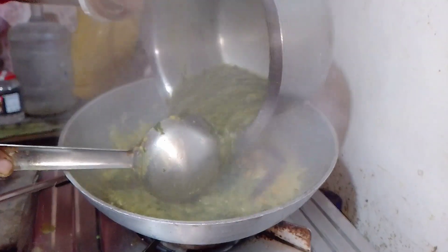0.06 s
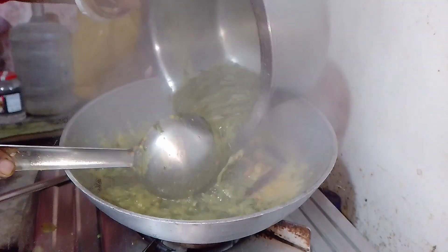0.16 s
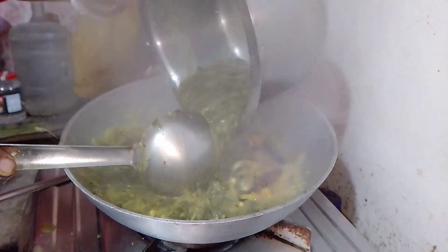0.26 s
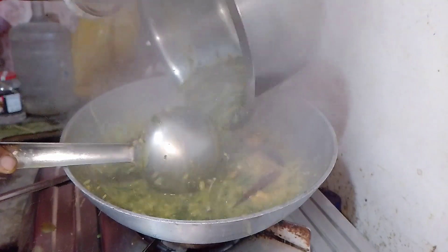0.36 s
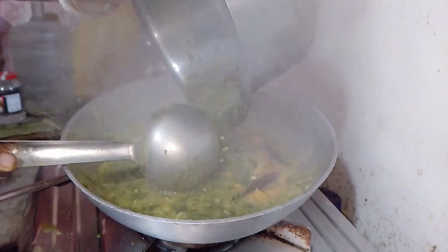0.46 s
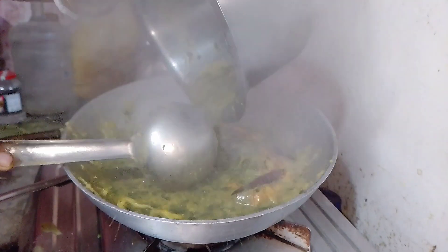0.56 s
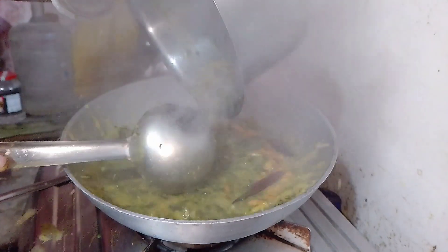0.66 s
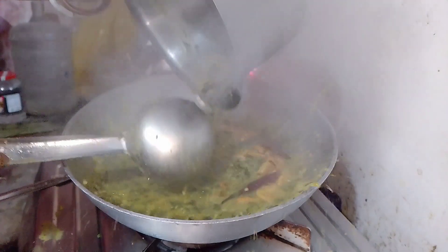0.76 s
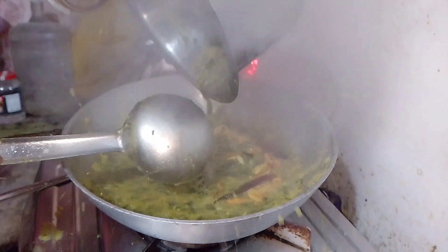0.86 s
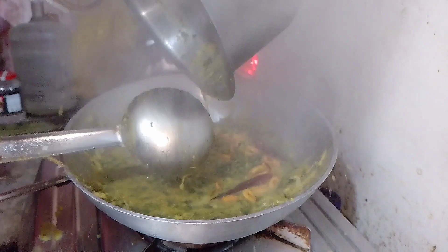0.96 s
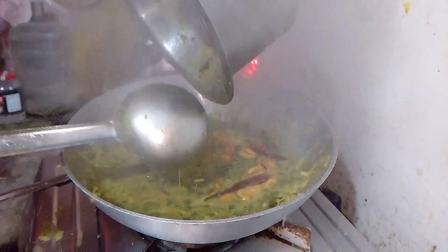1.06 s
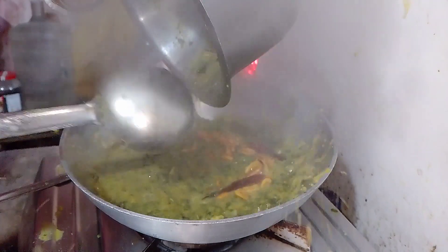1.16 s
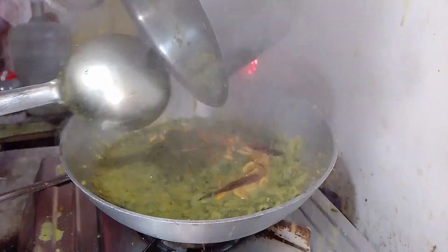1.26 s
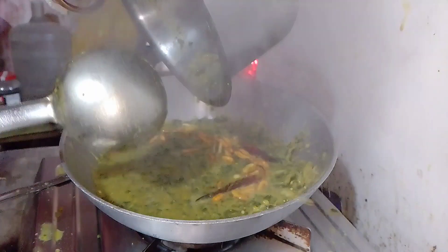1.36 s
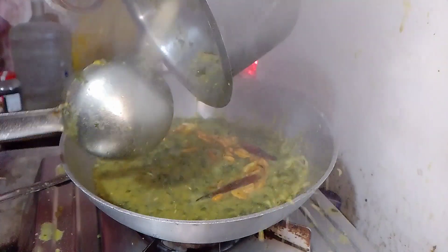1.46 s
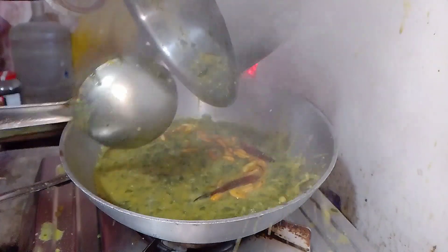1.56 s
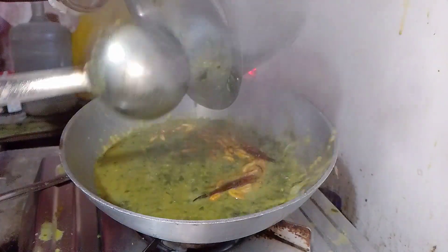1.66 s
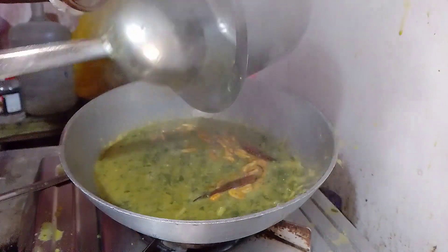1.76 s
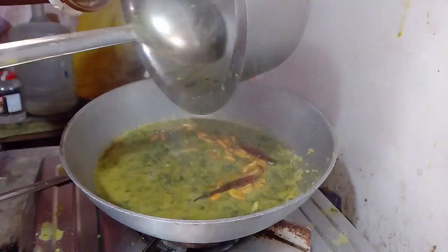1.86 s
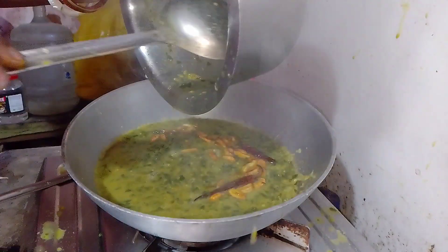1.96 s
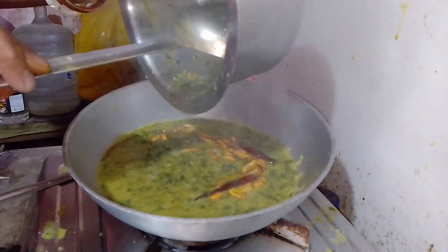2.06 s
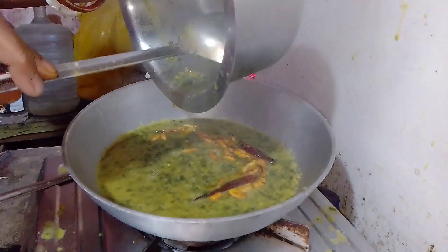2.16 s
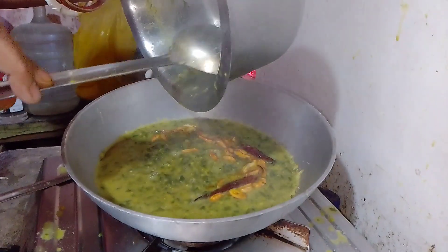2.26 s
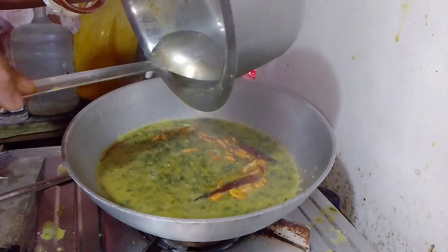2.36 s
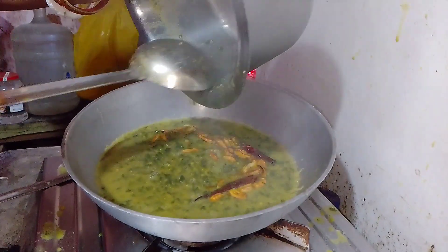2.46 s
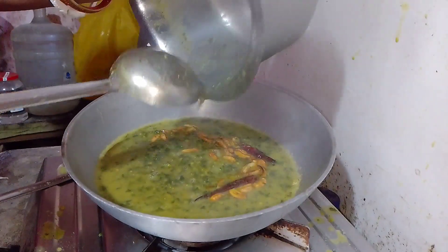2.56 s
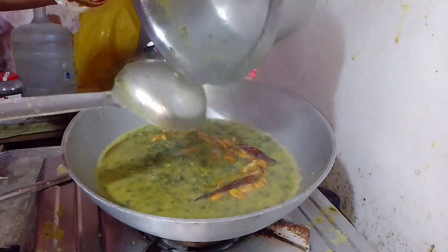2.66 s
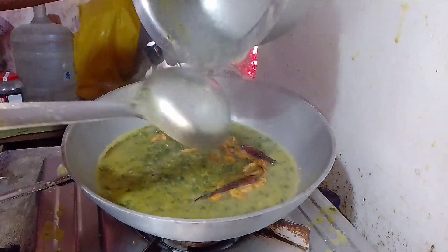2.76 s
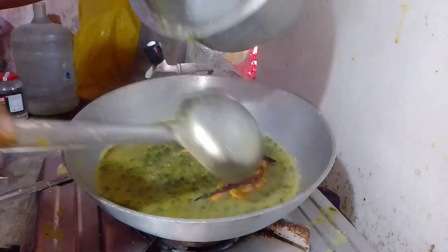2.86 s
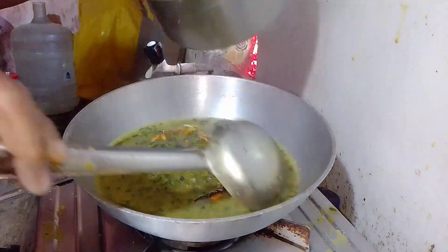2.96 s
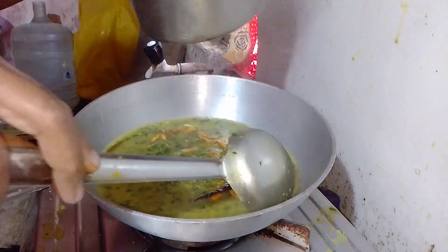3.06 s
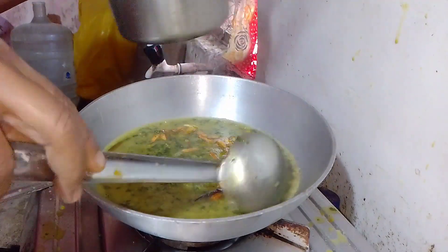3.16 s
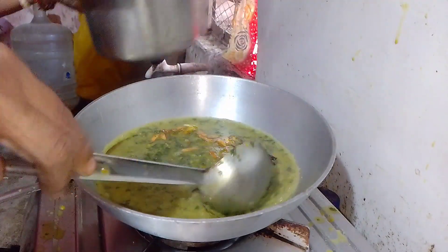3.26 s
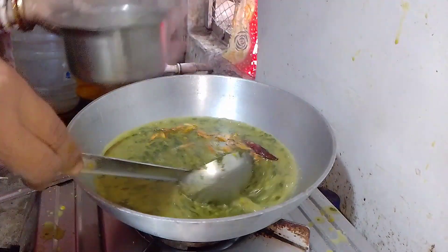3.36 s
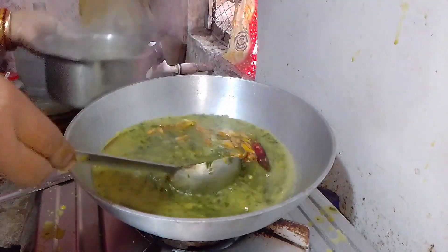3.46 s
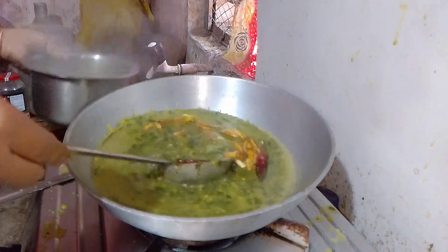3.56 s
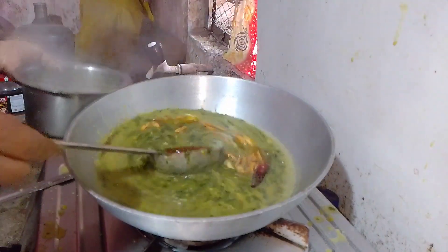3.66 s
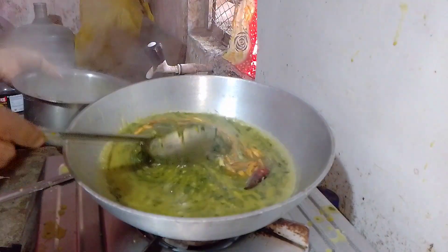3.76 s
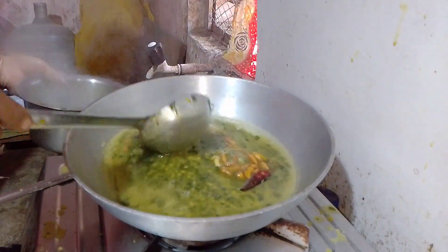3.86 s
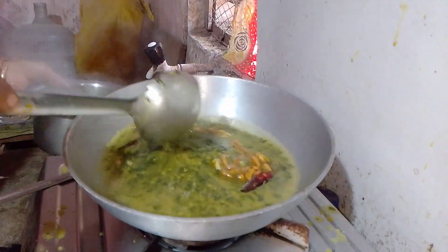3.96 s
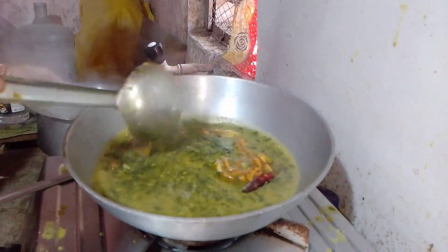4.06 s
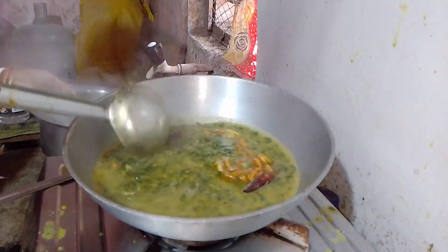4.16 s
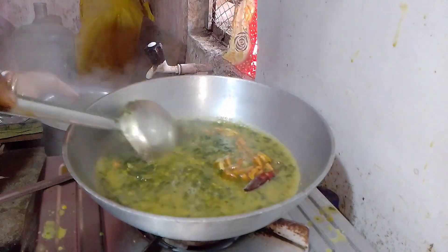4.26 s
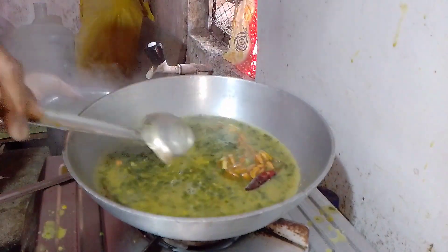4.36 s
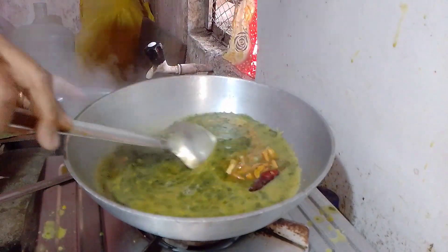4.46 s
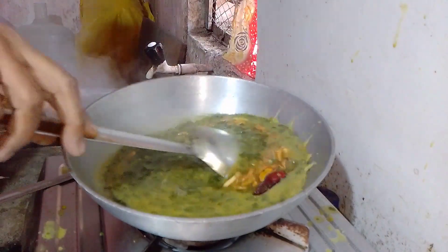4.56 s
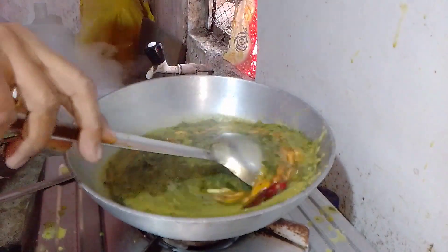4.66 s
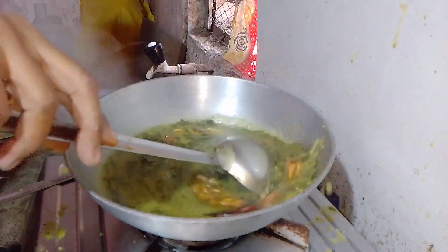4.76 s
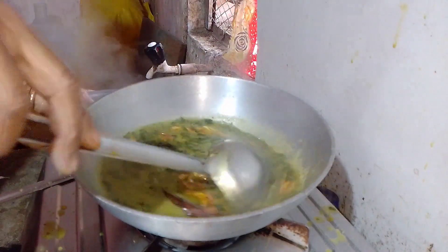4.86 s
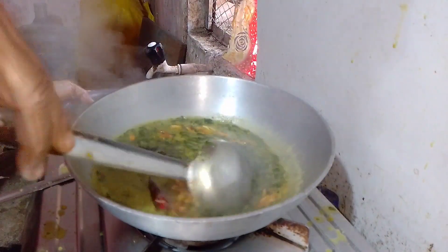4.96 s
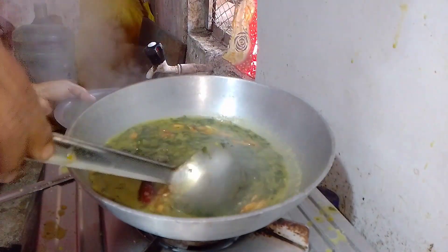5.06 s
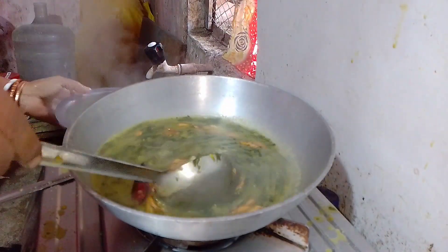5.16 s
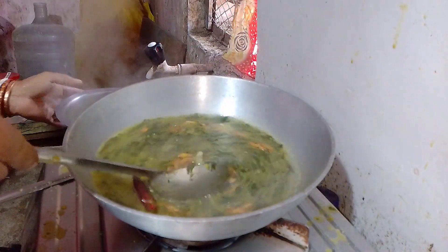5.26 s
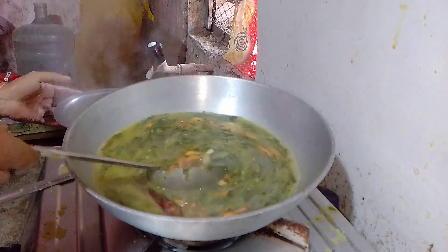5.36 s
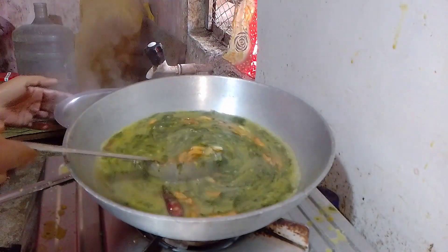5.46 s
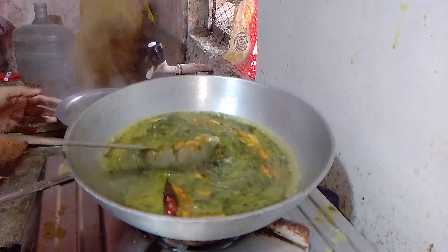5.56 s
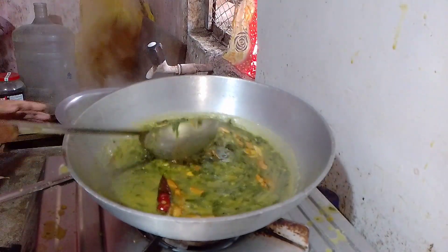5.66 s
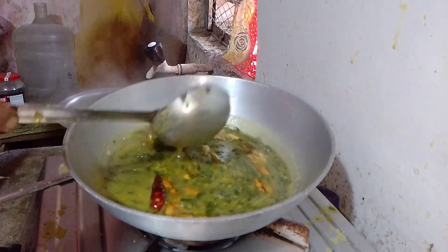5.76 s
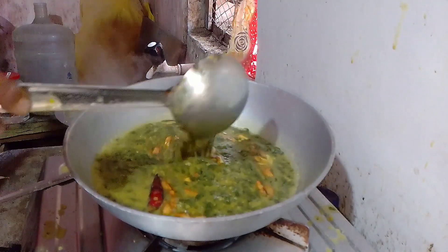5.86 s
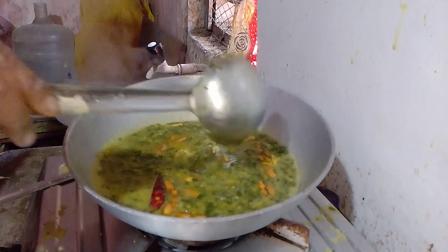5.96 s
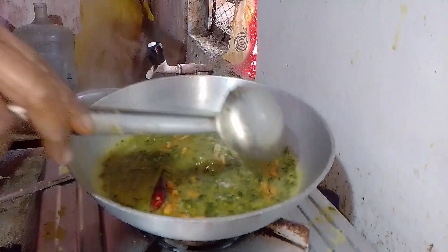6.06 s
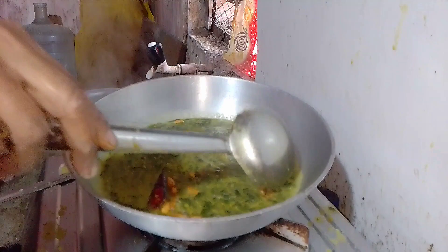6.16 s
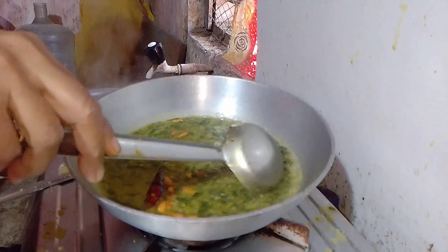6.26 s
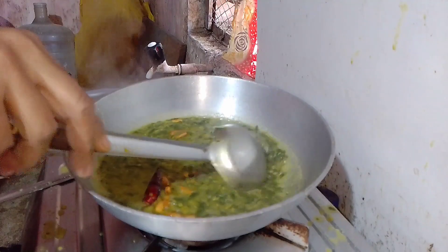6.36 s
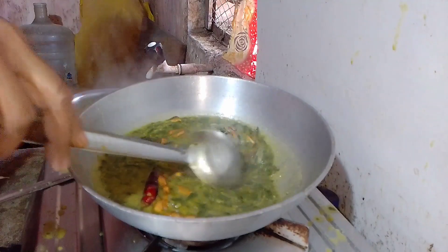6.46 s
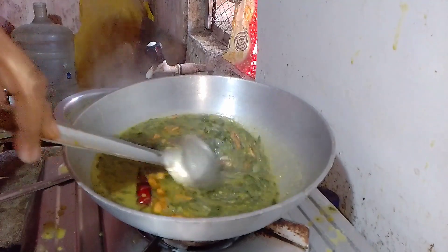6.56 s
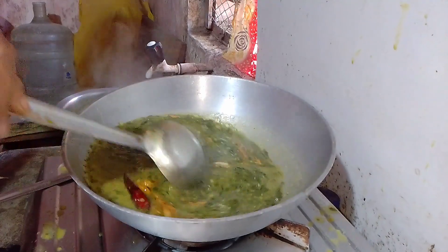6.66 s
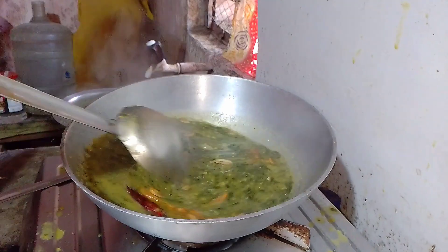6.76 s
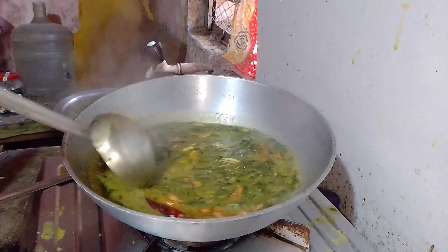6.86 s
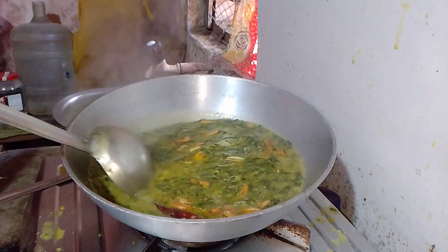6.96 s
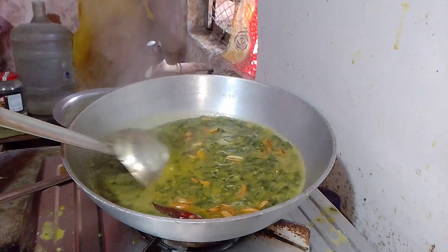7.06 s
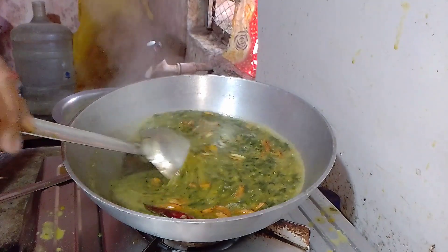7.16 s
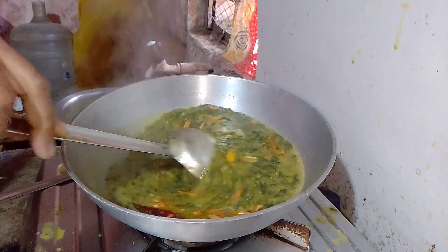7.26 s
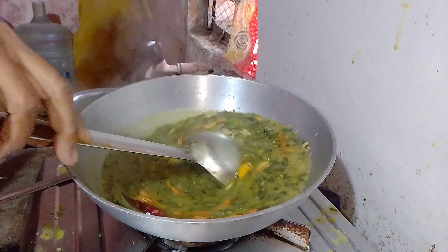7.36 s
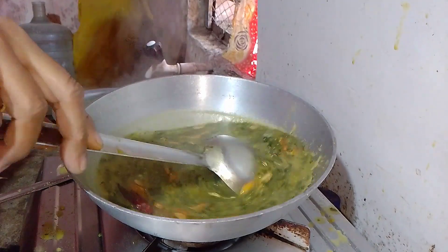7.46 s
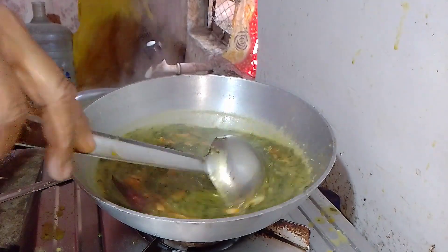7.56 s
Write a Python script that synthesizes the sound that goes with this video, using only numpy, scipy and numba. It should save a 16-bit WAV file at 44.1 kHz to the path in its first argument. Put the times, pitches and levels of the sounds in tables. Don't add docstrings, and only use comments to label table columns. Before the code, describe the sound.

Phone microphone near a stove: a full, crackling roar of steam and hot fat comes first, then drops to a thinning sizzle. A hard metallic clink with a second knock and short scrape follows, then a ringing ladle tap, grating strokes in the thin pan and quiet stirring. The broth swishes and gurgles, with hissing rising at each stroke, in a slightly echoing room.

```python
import sys
import numpy as np
from scipy import signal
from scipy.fft import rfft, irfft, next_fast_len
from scipy.io import wavfile
from scipy.ndimage import uniform_filter1d
from numba import njit

SR = 44100
rng = np.random.default_rng(int(sys.argv[2]) if len(sys.argv) > 2 else 0)


def inscribe(sig):
    pcm = np.round(np.clip(np.atleast_2d(sig).T, -1, 1) * 32767)
    wavfile.write(sys.argv[1], SR, pcm.astype(np.int16))


def how_loud(loudness_db):
    steps = np.asarray(loudness_db, float) / 20
    return 10 ** steps


N = 335601
TIME = np.arange(N) / SR
SIZE = next_fast_len(N)
HZ = np.maximum(np.arange(SIZE // 2 + 1) * SR / SIZE, 1.)

# (time [s], fine spit level [dB])
COOLING = [(0, -30.5), (.65, -31.5), (1.5, -37), (2.3, -43), (3.05, -46.5), (4.0, -51.5), (5.8, -60),
           (6.5, -61.5), (7.61, -57)]
HOT_DB = -30.5


def level(x, db):
    return x * how_loud(db) / np.sqrt(np.mean(x ** 2))


def colour(points):
    hz, db = np.transpose(points)
    return how_loud(np.interp(np.log(HZ), np.log(hz), db))


def curve(points):
    return np.interp(TIME, *np.transpose(points))


def walk(rate):
    hold = int(SR / rate)
    steps = np.repeat(rng.standard_normal(N // hold + 1), hold)
    return 0.83 * uniform_filter1d(uniform_filter1d(steps, hold), hold)[:N]


def crackle(rate, spread_db):
    chance = rng.random((2, N))
    size = how_loud(-spread_db * np.log(1 - chance[1] + 1e-9))
    return level((chance[0] < rate / SR) * size * rng.choice([-1., 1.], N), 0)


@njit
def svf(x, hz, width):
    y, band, low = np.empty(len(x)), 0., 0.
    for i in range(len(x)):
        g, k = np.tan(np.pi * hz[i] / SR), width / hz[i]
        v = (band + g * (x[i] - low)) / (1 + g * (g + k))
        band, low, y[i] = 2 * v - band, low + 2 * g * v, k * v
    return y


def swell(start, peak, end):
    rise = (TIME - start) / (peak - start)
    fall = (end - TIME) / (end - peak)
    return np.sin(np.pi / 2 * np.clip(np.minimum(rise, fall), 0, 1))


def bumps(rows):
    return sum(db * swell(a, (a + b) / 2, b) for a, b, db in rows)


def gestures(rows, rise):
    start, end, db, hz = np.transpose(rows)
    gain = sum(how_loud(d) * swell(a, a + rise * (b - a), b) for a, b, d in zip(start, end, db))
    return gain, np.interp(TIME, (start + end) / 2, hz)


def follows(heat_db, law, lift_db):
    hot_db, slope, simmer_db, db_per_s = law
    heat_power = how_loud(hot_db + slope * (heat_db - HOT_DB)) ** 2
    simmer_power = how_loud(simmer_db + db_per_s * TIME + lift_db) ** 2
    return 10 * np.log10(heat_power + simmer_power)


def rumble():
    # (frequency [Hz], density [dB per Hz])
    low_air = [(29, -41), (50, -9), (81, -2), (113, -0.5), (129, 4), (165, -25), (210, -40), (360, -120)]
    # (start [s], end [s], gain [dB])
    shakes = [
        (3.06, 3.22, 7),
        (4.3, 4.55, 7),
        (4.58, 4.92, 13),
        (7.3, 7.7, 8),
    ]
    shake_db = bumps(shakes)
    flame_db = follows(curve(COOLING), (-46.5, 1.65, -64.5, -1.5), shake_db)
    puff_db = -47.5 - 45 * np.maximum(TIME - 0.9, 0)
    puff_db = np.maximum(puff_db, -85 + .6 * shake_db) + 3.5 * walk(6.7)
    flame = irfft(rfft(rng.standard_normal(N), SIZE) * colour(low_air), SIZE)[:N]
    puff_shape = (HZ > 8) / (1 + (HZ / 50) ** 4)
    puffs = irfft(rfft(rng.standard_normal(N), SIZE) * puff_shape, SIZE)[:N]
    return level(flame, 0) * how_loud(flame_db + 2.2 * walk(4.8)) + level(puffs, 0) * how_loud(puff_db)


def slosh():
    # (start [s], end [s], level [dB], centre [Hz])
    gurgles = [
        (6.05, 6.17, -51, 604),
        (6.18, 6.45, -54, 500),
        (6.62, 6.74, -56, 600),
        (6.76, 6.94, -50.5, 584),
        (7.2, 7.33, -48, 535),
        (7.27, 7.5, -47.5, 560),
    ]
    gain, hz = gestures(gurgles, 0.33)
    return gain * level(svf(svf(crackle(800, 1.8), hz, 55.), hz, 100.), 0)


def swish():
    # (start [s], end [s], level [dB], centre [Hz])
    sweeps = [
        (4.52, 4.72, -43, 3900),
        (4.66, 4.86, -43, 2880),
        (4.8, 4.99, -38.5, 2200),
    ]
    gain, hz = gestures(sweeps, 0.71)
    return gain * level(svf(svf(crackle(6000, 1.6), hz, 830.0), hz, 1300.), 0)


def pot_scrape():
    # (start [s], length [s], frequency [Hz], width [Hz], level [dB])
    rubs = [(2.44, .1, 5730, 30, -39.5), (2.49, 0.081, 2550, 70, -34), (2.488, 0.069, 2370, 90, -38),
            (2.5, .04, 4810, 40, -40), (2.503, 0.054, 2820, 70, -40), (2.508, 0.086, 3760, 35, -37),
            (2.515, 0.12, 6070, 50, -41), (2.541, 0.16, 4040, 50, -38), (2.59, 0.073, 2290, 150, -36),
            (2.606, 0.082, 488, 35, -41.5)]
    out, chatter = 0, crackle(2500, 1.7)
    for s, length, hz, width, db in rubs:
        press = np.sin(np.pi * np.clip((TIME - s) / length, 0, 1) ** 0.69)
        out = out + how_loud(db) * press * level(svf(chatter, np.full(N, 1. * hz), 1. * width), 0)
    return out


def pan_scrape():
    # (time [s], peak level [dB], pitch [Hz])
    jolts = [(3.139, -34, 296), (3.179, -42, 320), (3.224, -31, 317), (3.276, -29, 300), (3.323, -33, 294),
             (3.348, -31.5, 295), (3.374, -33, 319), (3.434, -36, 312), (3.459, -32, 307),
             (3.515, -30.5, 336), (3.547, -34, 292), (3.574, -38, 317), (3.603, -37, 305),
             (5.021, -34, 303), (5.056, -33.5, 331), (5.072, -34, 317), (5.102, -31.5, 317),
             (5.147, -36, 301), (5.184, -35.5, 304), (5.224, -39, 302), (5.284, -34, 314),
             (5.314, -35.5, 315), (5.354, -40, 324), (5.412, -47, 301), (5.438, -41, 308)]
    # (start [s], end [s], level [dB], centre [Hz])
    rocking = [
        (3.11, 3.24, -40, 210),
        (3.28, 3.41, -50, 210),
        (4.76, 4.84, -48, 208),
    ]
    # (start [s], end [s], level [dB], centre [Hz])
    strokes = [
        (3.15, 3.27, -31, 2200),
        (3.26, 3.35, -28, 1800),
        (3.32, 3.43, -31, 1850),
        (5.0, 5.2, -37.5, 1740),
        (5.17, 5.42, -48, 1950),
    ]
    out, t = np.zeros(N), np.arange(SR // 8) / SR
    for s, db, hz in jolts:
        i = int(s * SR)
        push = (1 - np.exp(-t / 0.0042)) * np.exp(-t / .021)
        out[i:i + len(t)] += how_loud(db + 4) * push * np.sin(2 * np.pi * hz * t)
    gain, hz = gestures(rocking, .4)
    out += gain * level(svf(svf(crackle(160, 4.8), hz, 27.0), hz, 41.0), 0)
    gain, hz = gestures(strokes, 0.42)
    chatter = crackle(5000, 1.57)
    out += gain * how_loud(-3.5) * level(svf(svf(chatter, hz, 300.0), hz, 600.), 0)
    squeak = svf(svf(chatter, 3.47 * hz, 1500.), 3.6 * hz, 2000.)
    return out + gain * how_loud(-15.5) * level(squeak, 0)


def ladle_ring():
    start_s, start_db, t60_s, sing_hz = 3.102, -26, 1.15, 2957
    db = start_db - 60 * np.abs(TIME - start_s) / t60_s + 2.4 * walk(110) + 1.1 * walk(30)
    phase = 2 * np.pi * np.cumsum(sing_hz + 12 * walk(80)) / SR
    return (TIME > start_s) * how_loud(db) * np.sqrt(2) * np.sin(phase)


def strike(blows, modes, crack_db, scatter_db, low_hz, top_hz):
    out, t = np.zeros(N + SR), np.arange(SR // 2) / SR
    hz, db, t60 = np.array(modes).T[:, :, None]
    for s, blow_db, hard in blows:
        chance = rng.standard_normal((2, len(modes), 1))
        dull_db = -12 * (1 - hard) * np.log2(1 + hz / 700)
        gain = how_loud(db + dull_db + scatter_db * chance[0])
        tones = np.sin(2 * np.pi * hz * (1 + 0.0035 * chance[1]) * t)
        ring = np.sum(gain * np.exp(-np.log(1000) * t / t60) * tones, axis=0)
        fall = 0.68 * np.exp(-t / 0.0023) + 1.1 * np.exp(-t / 0.031)
        crack = how_loud(crack_db) * hard * fall * rng.standard_normal(len(t))
        i = int(s * SR)
        push_s = .0002 + .002 * (1 - hard) ** 2
        out[i:i + len(t)] += how_loud(blow_db) * 0.33 * (1 - np.exp(-t / push_s)) * (ring + crack)
    return signal.sosfilt(signal.butter(4, [low_hz, top_hz], "band", fs=SR, output="sos"), out[:N])


def ladle_blows():
    # (time [s], level [dB], hardness [0-1])
    clinks = [
        (2.4022, -5.5, 0.93),
        (2.4132, -32, 0.1),
        (2.4226, -33, 0.7),
        (2.432, -35, 0.1),
        (2.445, -34, 0.3),
        (2.476, -11, 0.32),
        (2.511, -30, 0.05),
        (2.597, -15, 0.14),
        (2.72, -36, 0.9),
    ]
    taps = [(3.1015, -18.5, 0.92), (3.122, -22, 0.6), (3.165, -18, 0.2), (3.475, -26, 0.45),
            (4.347, -22, 0.46), (4.425, -28, 0.4), (4.71, -23, .4), (4.75, -20, 0.3), (4.78, -29, 0.55),
            (4.935, -22, 0.32), (5.46, -33, 0.46)]
    rattles = [
        (3.102, -21, 0.74),
        (4.354, -19.5, 1),
        (4.8, -33, 0.8),
        (2.1, -42, .9),
    ]
    thuds = [
        (3.101, -17, .8),
        (4.655, -31, 0.5),
        (4.745, -27, .5),
        (4.8, -31, .4),
        (4.86, -30, .4),
        (4.93, -28, .5),
    ]
    # (frequency [Hz], level [dB], t60 [s])
    pot = [(572, 0, .12), (638, 1.5, .13), (903, -11, .16), (1150, -13, .12), (1383, -8, .27),
           (1537, -4, .27), (1902, -8, .2), (2148, -5, .2), (2271, -3, .22), (2419, -5, .2),
           (2575, -10, .2), (3447, -10, .22), (3920, -11, .18), (4320, -11, .12), (4649, -11, .2),
           (4807, -6, .2), (5070, -13, .12), (5253, -1, .12), (5757, -7, .25), (6130, -18, .15)]
    pan = [(227, -17, 0.61), (303, -3.5, 0.18), (480, 15.5, 0.016), (576, -2.5, 0.19), (643, -1, 0.043),
           (980, -8, 0.053), (1230, -20, 0.091), (1840, 1, 0.094), (2520, -5, .08), (2730, -1, .05),
           (3130, -10, .08), (4600, -5, 0.17), (5950, -11, .06), (6300, -17, .05), (9060, 5, 0.065)]
    ladle = [(2470, -4, 0.078), (2820, -5, 0.076), (2970, -4, .1), (3320, -1, .07), (3700, -7, .05)]
    broth = [(202, -10.5, 0.13), (330, -6, 0.095), (422, -6, 0.041), (517, 2, 0.062), (680, -5, .04),
             (1090, -10, .04)]
    blows = strike(clinks, pot, .3, 1.2, 430, 6200)
    blows = blows + strike(taps, pan, 0.94, 3.7, 245, 9500)
    blows = blows + strike(rattles, ladle, 2, 2.5, 1900, 4900)
    return blows + strike(thuds, broth, 0, 2.4, 165, 1500)


def kitchen_echo(metal):
    t60_s, echo_db = 0.32, -26
    t = np.arange(SR // 3) / SR
    echo = rng.standard_normal(len(t)) * np.exp(-np.log(1000) * t / t60_s) * (t > .004)
    return how_loud(echo_db) * signal.fftconvolve(metal, echo / np.sqrt(np.sum(echo ** 2)))[:N]


@njit
def pings(start, hz, size, fade, n):
    y = np.zeros(n + 2000)
    for k in range(len(hz)):
        z, p = size[k] + 0j, fade * np.exp(2j * np.pi * hz[k] / SR)
        for i in range(start[k], start[k] + 1500):
            z *= p
            y[i] += z.imag
    return y[:n]


def bubble_bursts():
    chance = rng.random((3, 30000))
    start = (chance[0] * N).astype(np.int64)
    size = how_loud(np.minimum(-2.2 * np.log(1 - chance[2]), 9))
    ringing = pings(start, chance[1] * SR * .4, size, np.exp(-1 / (0.0098 * SR)), N)
    return crackle(9000, 1.5) + 1.06 * rng.standard_normal(N) + level(ringing, -2.1)


def sizzle():
    # (frequency [Hz], density [dB per Hz])
    calm_shape = [(88, -61), (150, -24.5), (308, -4), (421, -2.5), (492, -3), (755, -5), (883, -10),
                  (1140, -6), (1550, -5.5), (2380, 0.5), (4110, -2), (7230, -16), (9140, -11.5),
                  (12700, -27.5), (15800, -17.5)]
    roar_shape = [(88, -55), (150, -14), (264, -6.5), (308, -0.5), (564, -5.5), (816, -4), (1780, -0.5),
                  (3520, -0.5), (6960, -14.5), (9140, -12), (12700, -26), (14900, -19.5), (15800, -22)]
    # (time [s], share [0-1])
    roar_share = [
        (0, 0.83),
        (.7, 0.86),
        (1.5, 0.27),
        (2.2, 0.),
        (7.61, 0.02),
    ]
    # (frequency [Hz], width [Hz], level [dB])
    pan_ring = [(476, 30, 2.5), (569, 14.5, 6), (632, 53, 5.5), (1248, 20, 4), (1720, 110, -4.5),
                (2010, 92, -3.5), (2370, 72, -8), (2690, 22, 1), (3540, 35, -1), (4130, 140, -6.5),
                (5930, 83, 4.5), (6340, 59, 3), (9830, 78, 2)]
    # (frequency [Hz], width [Hz], depth [0-1])
    counter_dips = [(162, 20, 0.9), (910, 170, 0.24)]
    # (start [s], peak [s], end [s], spit
    # gain [dB], simmer gain [dB])
    flare_rows = [(2.307, 2.502, 2.75, 4.5, -6), (3.168, 3.297, 3.47, 4, 2), (3.454, 3.714, 3.95, 9.5, 0),
                  (4.02, 4.203, 4.45, 5, 2.5), (4.407, 4.76, 5.06, 11, 5), (4.97, 5.146, 5.52, 8, 2),
                  (5.356, 5.556, 5.8, 9, 3), (5.83, 5.98, 6.37, 6.5, -0.5), (6.02, 6.172, 6.31, 0, 3.5),
                  (6.62, 6.796, 6.98, 12, 4.5), (6.922, 7.118, 7.34, 5, 5), (7.235, 7.373, 7.6, 9.5, 6.5),
                  (7.394, 7.59, 7.77, 7, 6.5)]
    # (start [s], end [s], gain [dB])
    churns = [
        (3.09, 3.4, 7),
        (3.38, 3.62, 6),
        (4.33, 4.6, 2.5),
        (4.55, 5.05, 9.5),
        (5.0, 5.55, 3.5),
        (6.6, 7.0, 2),
        (7.2, 7.8, 6),
    ]
    burst_law, bubble_law = (-30, 1.49, -39.5, -2.5), (-29.5, 1.5, -44, -1.81)

    flares = [(swell(a, b, c), spit, simmer) for a, b, c, spit, simmer in flare_rows]
    heat_db = curve(COOLING)
    spit_db = heat_db + sum(v * db for v, db, _ in flares)
    lift_db = sum(v * db for v, _, db in flares)
    burst_db = follows(spit_db, burst_law, lift_db) - spit_db
    deep_db = heat_db + 0.58 * (spit_db - heat_db)
    bubble_db = follows(deep_db, bubble_law, bumps(churns)) - spit_db
    share = curve(roar_share)
    fine_db = 5 * share

    spectrum = rfft(bubble_bursts(), SIZE)
    ring = 1 + .5 * sum(how_loud(db) / (1 + ((HZ - f) / (w / 2)) ** 2) for f, w, db in pan_ring)
    calm = spectrum * colour(calm_shape) * ring
    wild = spectrum * colour(roar_shape) * ring
    for f, w, depth in counter_dips:
        calm = calm * (1 - depth / (1 + ((HZ - f) / (w / 2)) ** 2))
    top = (HZ > 6500) & (HZ < 11000)
    calm, wild = (v / np.sqrt(2 * np.sum(np.abs(v[top]) ** 2) / SIZE / N) for v in (calm, wild))

    out, surge, last = 0, walk(10), walk(14)
    for octave in np.arange(7, 14.6, .5):
        band = np.cos(np.pi * np.clip(np.log2(HZ) - octave, -.5, .5)) ** 2
        own = walk(14)
        fine = np.clip((octave - 13.2) / 1.4, 0, 1)
        larger = np.clip((12.8 - octave) / 1.84, 0, 1)
        thick = np.clip((10.3 - octave) / 0.21, 0, 1)
        flicker_db = (1 - 0.56 * share) * (0.95 * surge + .5 * (own + last))
        db = spit_db + fine * fine_db + (larger - thick) * burst_db + thick * bubble_db + flicker_db
        mix = (1 - share) * irfft(calm * band, SIZE)[:N] + share * irfft(wild * band, SIZE)[:N]
        out, last = out + how_loud(db) * mix, own
    return out


def scene():
    background = rumble() + slosh() + swish()
    metal = pot_scrape() + pan_scrape() + ladle_ring() + ladle_blows()
    metal = signal.sosfilt(signal.butter(4, 170, "high", fs=SR, output="sos"), metal)
    mono = background + metal + kitchen_echo(metal) + sizzle()
    return np.array([mono, mono])


def roll_off(x):
    return signal.sosfilt(signal.butter(12, 15910, fs=SR, output="sos"), x)


def record(dry):
    low_pass = signal.ellip(10, .2, 80, 15720, fs=SR, output="sos")
    x = signal.sosfilt(low_pass, np.tanh(1.1 * dry) / 1.1)
    side, frame = np.zeros(N), 1536
    for when, where in rng.random((24, 2)):
        i = int(when * (N - 3 * frame)) + frame
        hz = 4300 * 3.1 ** where ** .8
        band = signal.butter(6, [hz, 1.18 * hz], "band", fs=SR, output="sos")
        side[i:i + frame] += how_loud(-3) * np.hanning(frame) * signal.sosfilt(band, x[0, i - frame:i])
    return roll_off(x + np.array([side, -side]))


dry = scene()
out = record(dry)
inscribe(out)
```